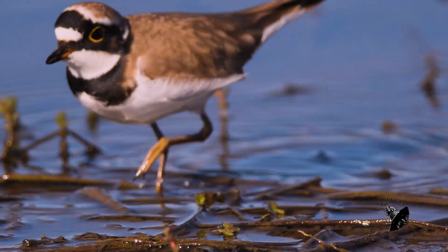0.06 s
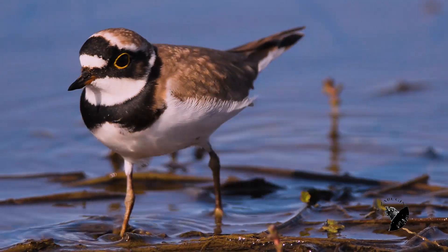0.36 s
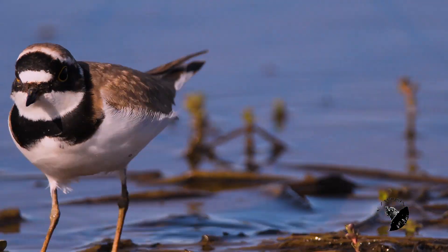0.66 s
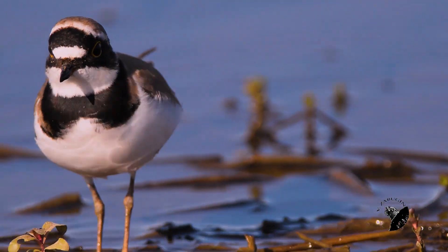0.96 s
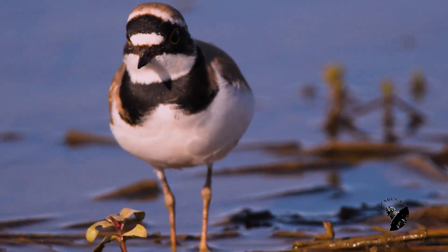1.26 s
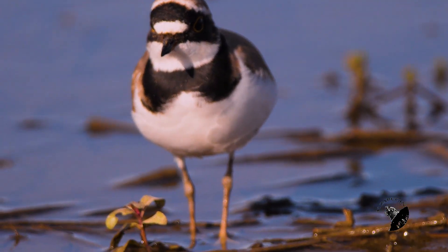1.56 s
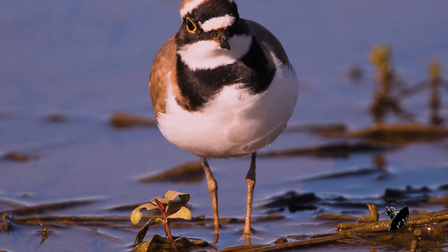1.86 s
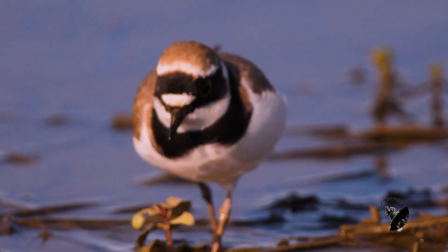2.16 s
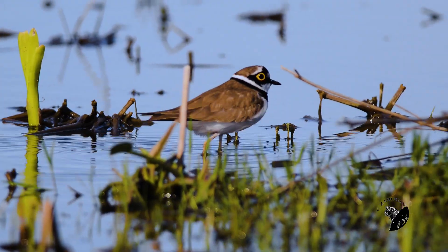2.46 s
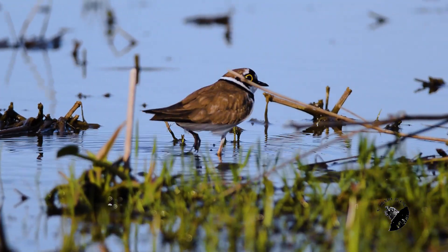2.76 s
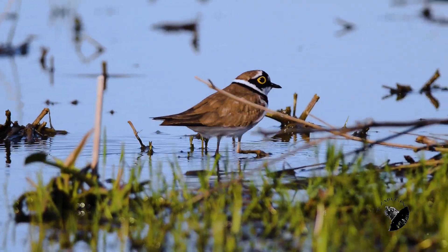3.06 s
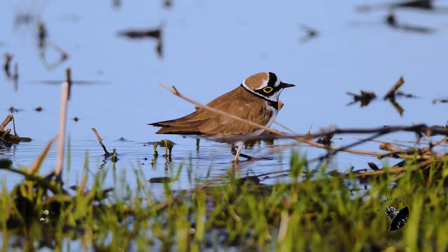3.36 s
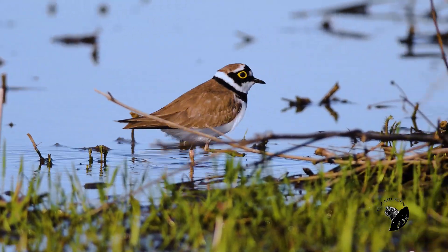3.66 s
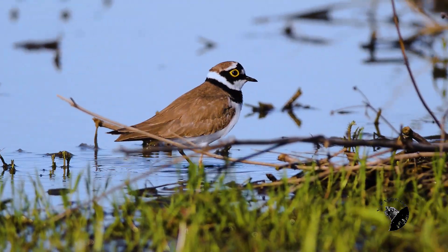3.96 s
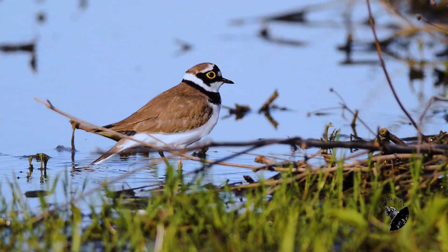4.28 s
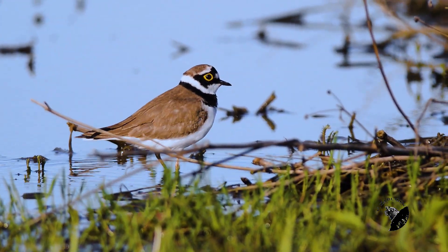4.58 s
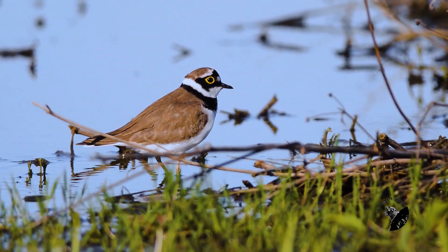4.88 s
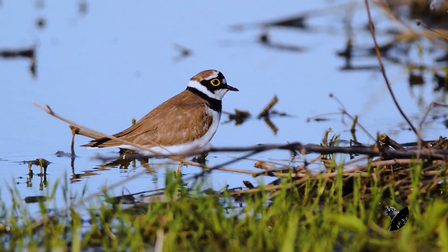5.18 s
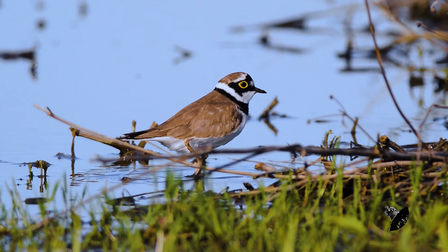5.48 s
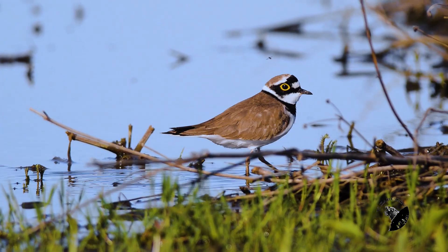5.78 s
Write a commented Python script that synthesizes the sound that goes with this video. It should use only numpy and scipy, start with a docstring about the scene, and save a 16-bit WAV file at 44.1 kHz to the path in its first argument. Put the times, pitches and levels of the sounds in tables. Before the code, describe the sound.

Small wading birds call with fluttering yodels, falling whistles and a run of short high pips over a soft outdoor hiss.

```python
"""Plovers call by open water: short pips, three falling whistles and fluttering two-register yodels.
Membranes in the syrinx make the tones; throat and bill colour them; airflow that nearly shuts makes
the flutter. A small bird trills far off and a few drops tick. The shore echoes the birds faintly.
Underneath lie a soft outdoor hiss and puffs of wind on the microphone."""
import sys
import numpy as np
from scipy import signal
from scipy.fft import rfft, irfft
from scipy.io import wavfile
from scipy.ndimage import uniform_filter1d

SR = 44100
rng = np.random.default_rng(int(sys.argv[2]) if len(sys.argv) > 2 else 0)


def transcribe(signal):
    """Save signal, clipped to [-1, 1], as a 16-bit WAV file at the path in sys.argv[1]."""
    frames = np.atleast_2d(signal).T
    limited = np.clip(frames, -1, 1)
    pcm = np.round(limited * 32767).astype(np.int16)
    wavfile.write(sys.argv[1], SR, pcm)


N = 265923
TIME_S = np.arange(N) / SR

# Each row: start in seconds, level in dB, length in seconds, lead-in level in dB.
PIP_NOTES = [(0.4528, -35.5, .012, -70), (.689, -34.5, .014, -52), (1.6476, -33, .0115, -72),
             (1.9168, -35.5, .0125, -75), (2.828, -33.5, 0.012, -51), (3.6508, -29.5, .0097, -55),
             (3.8353, -34.5, 0.0082, -51), (4.0068, -32, .0084, -55.5), (4.172, -32, .0079, -49),
             (4.36, -31, 0.0081, -50), (4.549, -32.5, 0.0081, -48), (4.732, -29, 0.0087, -48.5),
             (4.9267, -28.5, .0088, -57), (5.108, -30, 0.00845, -54.5), (5.282, -31, 0.01105, -60),
             (5.476, -32, 0.00973, -56), (5.676, -30, 0.00955, -56), (5.871, -32.5, .011, -62.5)]
# Pips sharpen into a run; their lead-ins climb far above. Each row: time in seconds, pitch in Hz.
PIP_PITCH_HZ = [(1.9, 2693), (2.9, 2768), (3.7, 2835), (5.9, 2842)]
LEAD_PITCH_HZ = [(2.8, 2710), (3.85, 3908), (4.9, 4117), (5.9, 4028)]
# The creak that ends a pip. Each row: time as a multiple of creak_s, pitch ratio, fade in dB.
CREAK_CURVE = [(0, 1.168, -3), (.5, .9, -2), (1, .72, -12), (2, .3, -45)]
# Each row: start, top of the leap and end in seconds, top and held pitch in Hz, sag in Hz/s,
# top and held level in dB, fade in dB/s, overtone gain in the leap in dB.
WHISTLE_NOTES = [(0.548, .576, .666, 3085, 2103, 1077, -29.5, -42.5, 13, -9),
                 (1.063, 1.073, 1.497, 3290, 2375, 175, -47.5, -40.5, 14, 2),
                 (4.776, 4.786, 5.204, 3280, 2330, 166, -35.5, -39, 2, -23)]
# One row per whistle: weights of harmonics 2, 3 and 4 in dB, ahead of the bill's colour.
WHISTLE_HARMONICS_DB = [(0, -1, 4.5), (0, -12, -20), (0, -9, -15.5)]
# Each row: start, flip up, break down, second flip and end in seconds, pitch after the flip in Hz,
# top level in dB, then the clear note's pitch in Hz, sag in Hz and level in dB.
YODEL_PHRASES = [(.795, .8815, .958, 1.054, 1.152, 2370, -32, 2168, 100, -40.5),
                 (2.038, 2.1145, 2.224, 2.305, 2.422, 2035, -36, 2132, 15, -39.7),
                 (2.933, 3.0095, 3.089, 3.175, 3.2765, 2515, -29.5, 2252, 140, -39)]
LOW_REGISTER_RATIO = .74  # low pitch over high pitch
# Low buzzes, one alone and one after each yodel. Each row: start and end in seconds, pitch in Hz,
# level in dB.
BUZZ_NOTES = [(0, .122, 1510, -50), (1.153, 1.285, 1522, -49.5), (2.421, 2.559, 1512, -48.3),
              (3.278, 3.415, 1596, -48)]
# Throat and bill resonance; overtone colour with the bill wide open; air rasp of whistle and yodel.
# Each row: frequency in Hz, relative gain in dB.
THROAT_DB = [(500, -27), (1000, -4.5), (1500, -2), (2200, 0.5), (2800, 1), (3300, -13), (4200, -18),
             (7000, -64), (12000, -50)]
OPEN_BILL_DB = [(1400, -9.5), (3000, 11), (4200, 0), (5200, -2.5), (6300, 2.5), (7200, -15.5), (8200, -0.5),
                (9500, 2), (10600, -72), (14000, -40)]
WHISTLE_RASP_DB = [(2000, -26), (5000, -20), (10000, 23), (15000, -15.5)]
YODEL_RASP_DB = [(1500, -38), (2300, 14), (2750, 7), (3100, -25), (3900, -43)]
# Each row: start and end in seconds, first and last pitch in Hz, first and last level in dB.
FAR_TRILLS = [(0.102, .218, 4580, 4213, -66, -53.5), (1.508, 1.56, 4250, 3700, -61, -58.5)]
# Each row: start in seconds, ring pitch in Hz, level in dB.
WATER_DROPS = [(0.659, 7050, -46), (.838, 8400, -53), (.929, 8700, -52), (1.288, 12000, -54),
               (1.46, 9160, -49), (3.349, 14000, -51.5), (3.390, 8100, -48), (3.432, 7000, -51),
               (3.683, 8000, -42.5), (4.092, 8450, -49), (5.265, 12000, -53), (5.703, 8500, -54)]
# Each row: middle in seconds, half length in seconds, level in dB.
WIND_PUFFS = [(.025, .039, -48), (.096, .022, -48), (.509, .012, -48), (.61, .027, -52), (.997, .037, -52)]
# Wind and hiss spectra. Each row: frequency in Hz, relative density in dB.
WIND_DB = [(15, -20), (48, 2.0), (90, -6.0), (170, -20.5), (400, -46), (2000, -80)]
HISS_DB = [(15, -30), (25, -9), (69, -2.5), (136, -2), (169, -2), (204, -2.5), (253, -3), (313, -4),
           (804, -8), (1050, -9.5), (1410, -11), (1620, -12.5), (2700, -16), (4260, -19.5), (15500, -24.5)]
# Each row: middle in seconds, half length in seconds, level change in dB.
HISS_DIPS = [(1.91, 0.14, -1.5), (5.87, .04, -3.5), (6.03, 0.0554, -4.5)]


def pips(lead_s=.01, overlap_s=.001194, onset_s=.004, lead_pull=.43):
    """A thin lead-in breaks into a short sagging tone that ends in a creak."""
    out = np.zeros(N)
    scatter = rng.standard_normal((len(PIP_NOTES), 2))
    for (start, db, length_s, lead_db), chance in zip(PIP_NOTES, scatter):
        hz = np.interp(start, *np.transpose(PIP_PITCH_HZ))
        lead_hz = np.interp(start, *np.transpose(LEAD_PITCH_HZ))
        pull_hz = lead_pull * (lead_hz - hz)
        add(out, start - lead_s, lead_in(lead_s + overlap_s, lead_hz, pull_hz, lead_db), edge_s=.00073)
        add(out, start - onset_s, pip_tone(onset_s, length_s, hz, pull_hz, db))
        add(out, start + length_s - overlap_s, creak(db, *chance), edge_s=.0012)
    return out


def lead_in(length_s, hz, pull_hz, db, slide_s=.00084):
    """A faint held tone that slides towards the pip at its end."""
    t = np.arange(0, length_s, 1 / SR)
    pitch_hz = hz - pull_hz * np.exp((t - length_s) / slide_s)
    gain = np.sqrt(2) * undb(db + 1.8 * waver(t, 630))
    return gain * np.sin(phase_rad(pitch_hz * (1 + .014 * waver(t, 550))))


def pip_tone(onset_s, length_s, hz, pull_hz, db, sag=.043, scoop=.063, scoop_s=.00076,
             edge_s=.001, droop_db=-2, arch_db=-4, arch_s=.009):
    """The tone drops onto its pitch; long pips hold their level, quick ones arch through it."""
    t = np.arange(-onset_s, length_s + .005, 1 / SR)
    centred = t / length_s - .5
    pitch_hz = hz * (1 - sag * centred) + (scoop * hz + pull_hz) / (1 + np.exp(t / scoop_s + 1))
    gate = (1 + np.tanh(t / edge_s - .5)) * (1 - np.tanh((t - length_s) / edge_s + .5)) / 4
    arch = (arch_s / length_s) ** 2 * ((2 * centred) ** 2 - .3)
    level_db = db + droop_db * centred + arch_db * arch
    return np.sqrt(2) * undb(level_db) * gate * np.sin(phase_rad(pitch_hz))


def creak(pip_db, pitch_chance, level_chance, creak_s=.007, base_hz=900, offset_db=-13,
          ring_hz=2820, width_hz=220, ring_db=2):
    """The membranes slow and shut; their last beats keep the throat ringing."""
    knots, *columns = np.transpose(CREAK_CURVE)
    t = np.arange(0, knots[-1] * creak_s, 1 / SR)
    ratio, fade_db = (np.interp(t / creak_s, knots, column) for column in columns)
    hz = base_hz * ratio * (1 + .091 * pitch_chance + .0945 * waver(t, 543))
    beats = undb(pip_db + offset_db + fade_db + 1.4 * level_chance) * syrinx(hz, tilt_db=-.46)
    ring = signal.lfilter(*signal.iirpeak(ring_hz, ring_hz / width_hz, fs=SR), beats)
    return beats + undb(ring_db) * ring


def whistles(mean_leap_hz_per_s=46000, swell_db=21.5, settle_s=.0128, accent_lag_s=.0052, accent_s=.02,
             release_s=.0152, release_hz=88, release_db=7.5, shimmer_db=.86):
    """A hard attack leaps up, settles on a pure note, then droops as the air runs out."""
    out = np.zeros(N)
    for note, harmonics_db in zip(WHISTLE_NOTES, WHISTLE_HARMONICS_DB):
        start, top, end, top_hz, held_hz, sag_hz_per_s, top_db, held_db, fade_db_per_s, harsh_db = note
        t, _ = span(start, end)
        before_s, after_s = np.maximum(top - t, 0), np.maximum(t - top, 0)
        leap_left = before_s / (top - start)
        release = np.exp((t - end) / release_s)
        hz = held_hz + (top_hz - held_hz) * np.exp(-after_s / settle_s)
        hz -= mean_leap_hz_per_s * (top - start) * leap_left ** 1.3
        hz -= sag_hz_per_s * after_s + release_hz * release
        db = held_db + (top_db - held_db) * np.exp(-np.maximum(after_s - accent_lag_s, 0) / accent_s)
        db -= swell_db * leap_left + fade_db_per_s * after_s + release_db * release
        tone = whistle_voice(t - top, hz, leap_left, harsh_db, harmonics_db)
        add(out, start, np.sqrt(2) * undb(db + shimmer_db * waver(t, 78.7)) * tone, edge_s=.0012)
    return out


def whistle_voice(t, hz, leap_left, harsh_db, harmonics_db, jitter=.0045, strain_db=11, rasp_db=-22,
                  clear_db=-26, clear_s=.00277, doubling_db=-1, doubling_s=.0041):
    """Overtones, forced-air rasp and period doubling die down at the top of the leap, t = 0."""
    phase = phase_rad(hz * (1 + jitter * waver(t, 262)))

    def partial(k):
        return colour(OPEN_BILL_DB, k * hz) * np.sin(k * phase)

    attack = 1 / (1 + np.exp(np.minimum(t / clear_s, 20)))
    overtone_db = clear_db + (harsh_db - clear_db) * attack + strain_db * leap_left
    second_db, third_db, fourth_db = harmonics_db
    third_db = third_db + .064 * (overtone_db - overtone_db.max())  # fades soonest
    overtones = sum(undb(db) * partial(k) for k, db in enumerate((second_db, third_db, fourth_db), 2))
    overtones += undb(rasp_db) * noise(WHISTLE_RASP_DB, len(t))
    doubling = undb(doubling_db) * (1 - np.tanh(t / doubling_s + .5)) / 2
    half_harmonics = sum(partial(k) / max(k - .5, 1) ** 2 for k in np.arange(.5, 4))
    build = np.where(t < 0, np.interp(hz, [2150, 2500], [.1, 1]), 1)
    return np.sin(phase) + build * (undb(overtone_db) * overtones + doubling * half_harmonics)


def yodels(flip_s=.0013, slow_flutter_hz=88, quick_flutter_hz=94):
    """Four notes in one breath; the first flip comes as the airflow reopens."""
    out = np.zeros(N)
    for start, flip, down, up, end, flip_hz, top_db, clear_hz, sag_hz, clear_db in YODEL_PHRASES:
        # each note gives t, hz, db, tilt_db, flutter
        notes = (stutter(start, flip, flip_hz, top_db), climb(flip, down, flip_hz, top_db),
                 slump(down, up, clear_hz), clear_note(up, end, clear_hz, sag_hz, clear_db))
        t, *controls = np.hstack([np.broadcast_arrays(*note) for note in notes])
        controls = uniform_filter1d(controls, int(flip_s * SR))
        cycle = (t - flip) * np.where(t < flip, slow_flutter_hz, quick_flutter_hz) % 1
        add(out, start, yodel_voice(t, *controls, cycle))
    return out


def stutter(start, end, flip_hz, top_db, flat=.077, first_db=-21, swell_db=10, tilt_db=-11, flutter=1):
    """Low pulses swell and tighten towards the flip."""
    t, u = span(start, end)
    hz = LOW_REGISTER_RATIO * flip_hz * (1 - flat * (1 - u ** 3))
    return t, hz, top_db + first_db + swell_db * u ** 2, tilt_db, flutter


def climb(start, end, flip_hz, top_db, rise_hz_per_s=4960, swell_db=7, ease_db=3, tilt_db=-41):
    """The high register climbs and swells as the flutter dies away."""
    t, u = span(start, end)
    db = top_db - swell_db * (u - 1) ** 2 - ease_db * u ** 12
    return t, flip_hz + rise_hz_per_s * (t - start), db, tilt_db, 1 - .92 * u


def slump(start, end, clear_hz, break_hz=1750, slack_hz=1410, edge_db=-46, slack_db=-7):
    """The voice breaks to the low register, slackens into a rattle and gathers for the next flip."""
    t, u = span(start, end)
    slack = np.sin(np.pi * u ** .85)
    taut_hz = break_hz + (LOW_REGISTER_RATIO * clear_hz - break_hz) * u
    hz = taut_hz + (slack_hz - taut_hz) * slack
    tilt_db = 3 - 27 * u ** 2
    return t, hz, edge_db + slack_db * slack, tilt_db, 1.08 * slack ** 2


def clear_note(start, end, hz, sag_hz, db, arch_hz=55, arch_db=2, tilt_db=-41, flutter=.072):
    """A pure, slightly arched note in the high register."""
    t, u = span(start, end)
    ends = (2 * u - 1) ** 2
    return t, hz - sag_hz * (u - .5) - arch_hz * ends, db - arch_db * ends, tilt_db, flutter


def buzzes(arch_hz=40, fade_db=-3.5, collapse=.49, collapse_s=.00906, flutter_hz=91):
    """A low held note grows buzzier as it fades, then its pitch collapses."""
    out = np.zeros(N)
    for start, end, hz, db in BUZZ_NOTES:
        t, u = span(start, end)
        slack = np.exp((t - end) / collapse_s)
        pitch_hz = (hz - arch_hz * (2 * u - 1) ** 2) * (1 - collapse * slack)
        voice = yodel_voice(t, pitch_hz, db + fade_db * (u - .5), tilt_db=-17 * (1 - u),
                            flutter=.083 + .54 * slack, cycle=(t - start) * flutter_hz % 1)
        add(out, start, voice)
    return out


def yodel_voice(t, hz, db, tilt_db, flutter, cycle, jitter=.0066, low_below_hz=1900, kick=.68,
                kick_db=7, buzz_hz=161.3, buzz_depth=.68, rasp_db=-46, rasp_cycles=.23):
    """Airflow nearly shuts each flutter cycle; on low notes it reopens sharp, bright and rasping."""
    flutter = np.clip(flutter, 0, 1)
    airflow = 1 - flutter * (.5 + .5 * np.cos(2 * np.pi * (cycle - .93))) ** 4.8
    rattle = flutter * (hz < low_below_hz)
    jolt = rattle * np.exp(-(cycle / .14) ** 2)
    pitch_hz = hz * (1 + kick * jolt + (jitter + .011 * rattle) * waver(t, 399.15))
    # a faster buzz shakes only the overtones, in level and phase
    buzz_rad = phase_rad(buzz_hz * (1 + .1126 * waver(t, 100)))
    shake = (1 + buzz_depth * np.cos(buzz_rad)) * np.exp(-1j * np.sin(buzz_rad))
    voice = undb(db + .11 * waver(t, 110)) * syrinx(pitch_hz, tilt_db + kick_db * jolt, shake, count=3)
    rasp = undb(rasp_db) * rattle * np.exp(-cycle / rasp_cycles) * noise(YODEL_RASP_DB, len(t))
    return airflow * (voice + rasp)


def syrinx(hz, tilt_db, overtone_gain=1, count=7):
    """Harmonics stepped by tilt_db each, then shaped by the throat resonance; rms near 1."""
    k = np.arange(1, count + 1)[:, None]
    gains = undb(tilt_db * (k - 1)) * colour(THROAT_DB, k * hz)
    gains /= np.sqrt(np.sum(gains ** 2, axis=0) / 2)
    harmonics = np.exp(1j * k * phase_rad(hz)) * np.where(k > 1, overtone_gain, 1)
    return np.sum(gains * harmonics.imag, axis=0)


def far_trills(chip_s=.0057, period_s=.0153, sweep=.08):
    """A small bird's evenly spaced downward chips sink in pitch and grow louder."""
    out, u = np.zeros(N), np.linspace(0, 1, int(chip_s * SR))
    for start, end, first_hz, last_hz, first_db, last_db in FAR_TRILLS:
        times_s = np.arange(start, end, period_s)
        chips = np.linspace((first_hz, first_db), (last_hz, last_db), len(times_s))
        for s, (hz, db) in zip(times_s, chips):
            tone = np.sin(phase_rad(hz * (1 - sweep * (u - .5))))
            add(out, s, np.sqrt(2) * undb(db) * np.sin(np.pi * u) * tone)
    return out


def drops(decay_s=.0015):
    """Faint ticks of water, each a noise burst around one high pitch."""
    out, t = np.zeros(N), TIME_S[TIME_S < .02]
    for start, hz, db in WATER_DROPS:
        burst = noise([(hz * .6, -30), (hz, 0), (hz * 1.55, -30)], len(t))
        add(out, start, undb(db) * np.exp(-t / decay_s) * burst, edge_s=.00032)
    return out


def shore(x, near_db=-22, near_t60_s=.12, far_db=-32, far_t60_s=.96, delay_s=.004):
    """Direct sound, quick scatter from water and reeds, and a thin long tail from the banks."""
    out, t = x, TIME_S[TIME_S < .8]
    for db, t60_s in ((near_db, near_t60_s), (far_db, far_t60_s)):
        tail = rng.standard_normal(len(t)) * undb(-60 * t / t60_s) * (t > delay_s)
        out = out + undb(db) * signal.fftconvolve(x, tail / np.linalg.norm(tail))[:N]
    return out


def wind():
    """Low puffs of wind on the microphone."""
    return sum(undb(db) * bump(s, half_s) for s, half_s, db in WIND_PUFFS) * noise(WIND_DB, N)


def hiss(level_db=-55, sway_db=.9):
    """Smooth distant hiss; the level sways and dips briefly."""
    dips_db = sum(db * bump(s, half_s) for s, half_s, db in HISS_DIPS)
    return noise(HISS_DB, N) * undb(level_db + dips_db + sway_db * waver(TIME_S, 5.9))


def undb(db):
    """Decibels to gain."""
    return 10 ** (np.asarray(db) / 20)


def colour(spectrum, hz):
    """Gain of a (Hz, dB) spectrum at hz."""
    knots_hz, db = np.transpose(spectrum)
    return undb(np.interp(np.log(np.maximum(hz, 1)), np.log(knots_hz), db))


def noise(spectrum, size):
    """Coloured noise, rms 1."""
    x = irfft(rfft(rng.standard_normal(size)) * colour(spectrum, np.fft.rfftfreq(size, 1 / SR)), size)
    return x / x.std()


def waver(t, rate_hz):
    """Random wander, spread near 1."""
    steps = (t - t[0]) * rate_hz
    count = int(steps[-1]) + 2
    return np.interp(steps, np.arange(count), rng.standard_normal(count))


def bump(middle_s, half_s):
    """Gaussian envelope, peak 1."""
    return np.exp(-((TIME_S - middle_s) / half_s) ** 2)


def phase_rad(hz):
    """Running phase."""
    return 2 * np.pi * np.cumsum(hz) / SR


def span(start_s, end_s):
    """A note's sample times t and progress u, 0 to 1."""
    t = np.arange(start_s, end_s, 1 / SR)
    return t, (t - start_s) / (end_s - start_s)


def add(out, start_s, x, edge_s=.00044):
    """Mix x in with softened ends."""
    i, k = max(int(start_s * SR), 0), np.arange(len(x))
    x = x * np.clip(np.minimum(k, k[::-1]) / (edge_s * SR), 0, 1)
    out[i:i + len(x)] += x[:max(N - i, 0)]


def scene():
    """Birds over the shore, with drops, hiss and wind; mono."""
    birds = pips() + whistles() + yodels() + buzzes() + far_trills()
    return (shore(birds) + drops() + hiss() + wind())[None]


def record(dry, cutoff_hz=15700):
    """Steep low-pass."""
    return signal.sosfilt(signal.ellip(10, .1, 70, cutoff_hz, fs=SR, output="sos"), dry)


dry = scene()
out = record(dry)
transcribe(out)
```